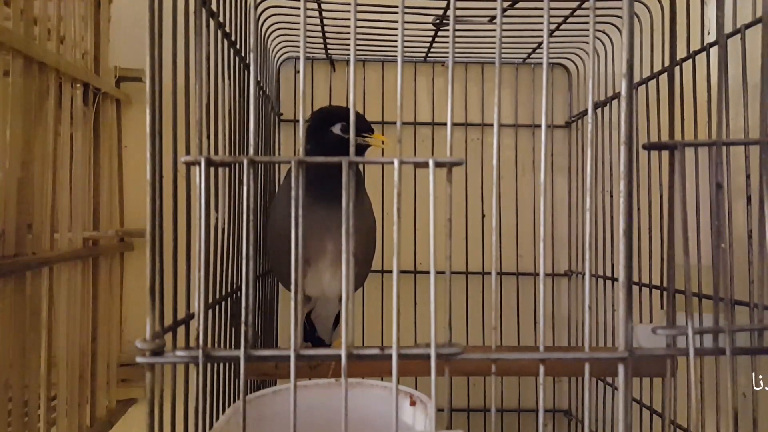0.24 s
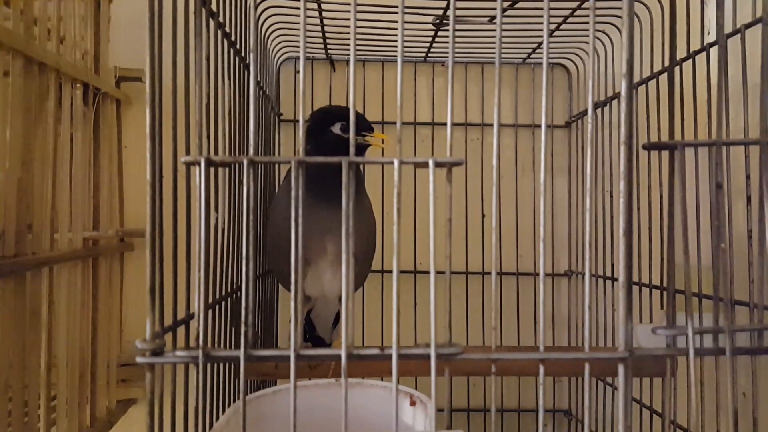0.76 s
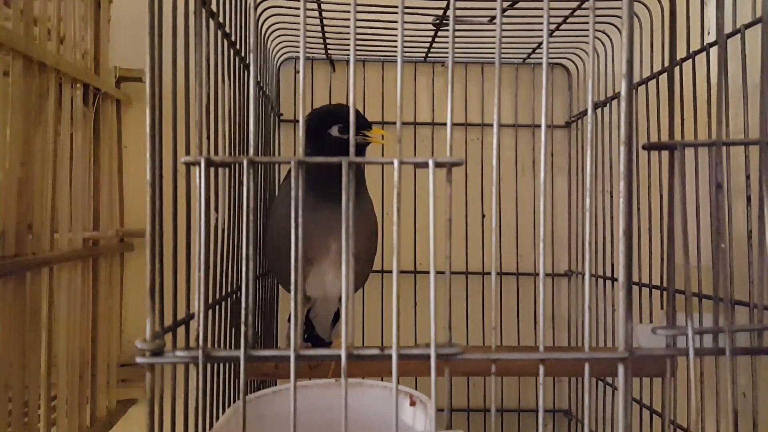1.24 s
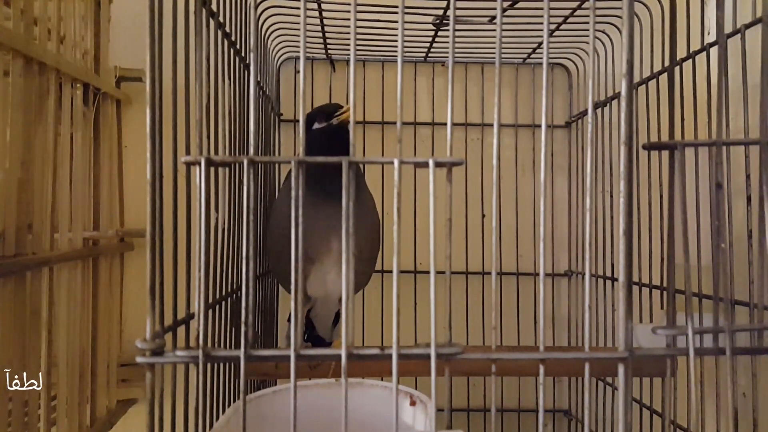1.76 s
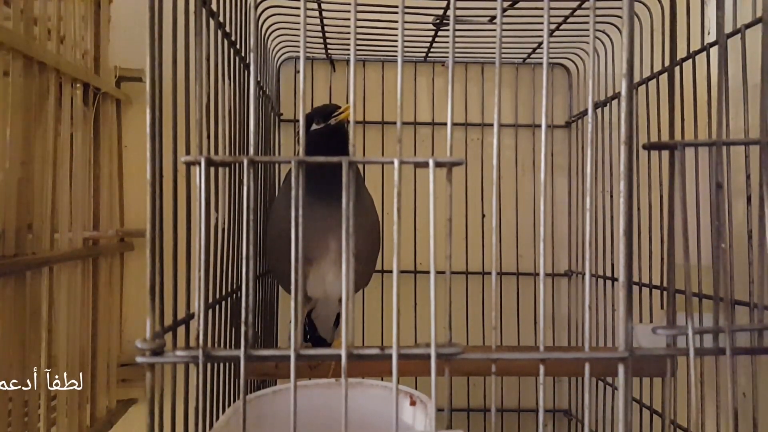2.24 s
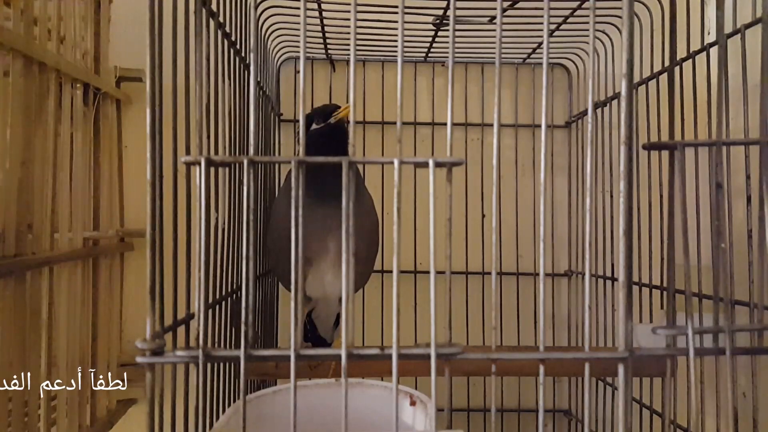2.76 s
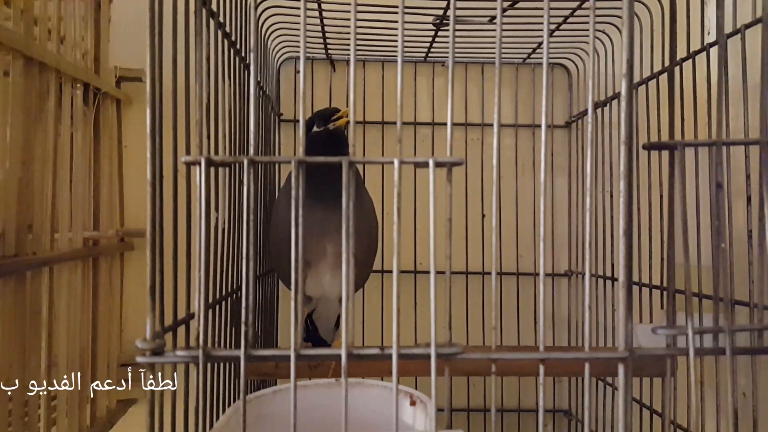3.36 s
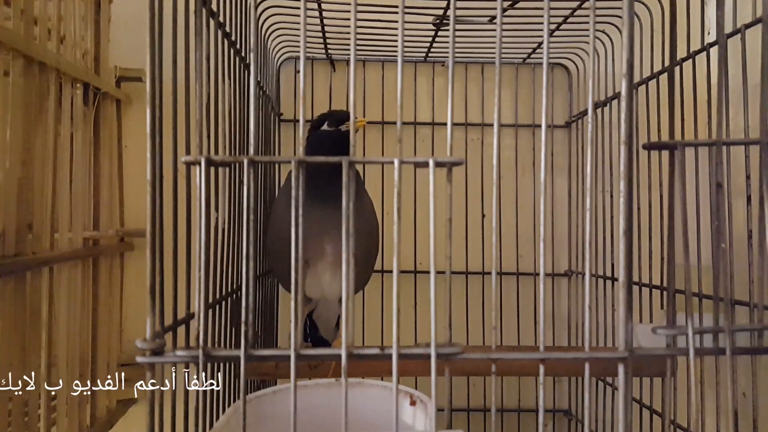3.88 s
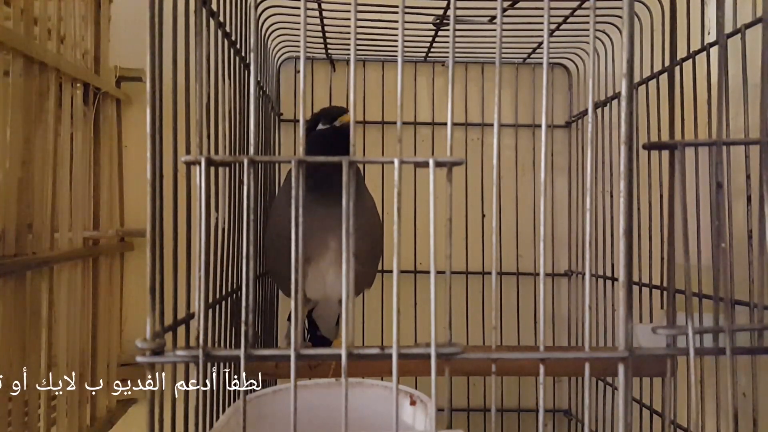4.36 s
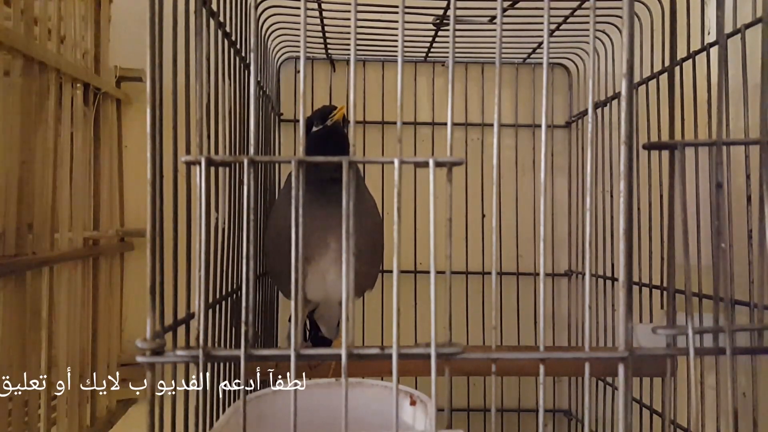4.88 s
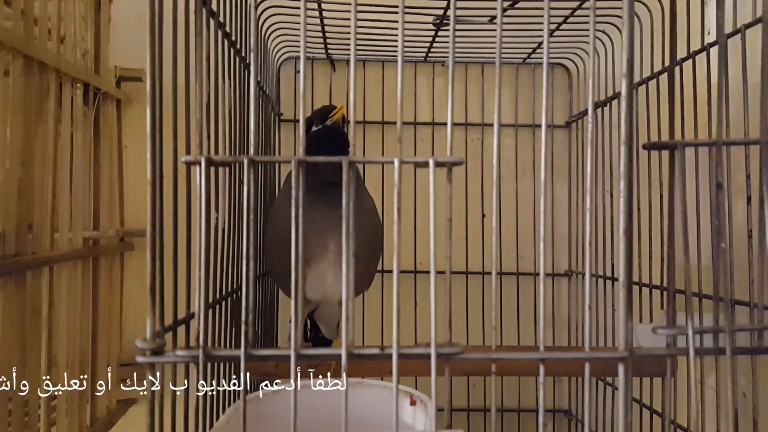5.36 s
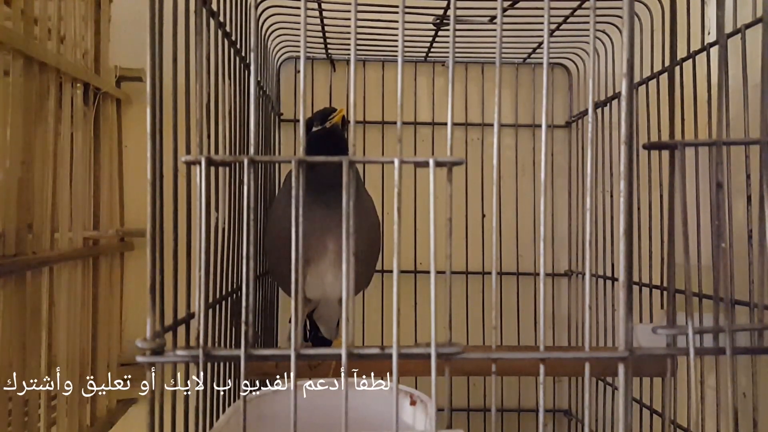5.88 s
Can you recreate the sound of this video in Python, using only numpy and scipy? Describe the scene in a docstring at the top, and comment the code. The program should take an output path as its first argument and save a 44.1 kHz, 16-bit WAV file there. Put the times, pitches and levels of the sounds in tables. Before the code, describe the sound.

Loud, clear bird whistles repeat briskly indoors, breaking into warbles, sharp chirps, six dry clucks and thin sliding squeals, with a quiet fan behind.

```python
"""Caged myna in a bare room

A caged myna sings in a bare, echoing room, close to a phone with two microphone ports. Whistles, flips
and slides are near sines with weak overtones and breath; thin glides have a strong 2nd overtone; a gurgling
warble swings its pitch fast; clucks mix two voices. Noise makes soft shuffles on the perch and a decaying
tail smears every sound of the bird. A fan hums faintly: wavering motor lines over rushing air."""
import sys
import numpy as np
from scipy import signal
from scipy.fft import rfft, irfft, next_fast_len
from scipy.io import wavfile
from scipy.ndimage import uniform_filter1d, minimum_filter1d, map_coordinates

SR = 44100
rng = np.random.default_rng(int(sys.argv[2]) if len(sys.argv) > 2 else 0)


def linear_from_db(decibels):
    """Turn decibels (scalar or array-like) into linear amplitude factors; 0 gives 1."""
    return 10 ** (np.asarray(decibels, float) / 20)


def dump_mix(stems):
    """Bounce the given channels to the path in sys.argv[1] as a 16-bit WAV at rate SR."""
    frames = np.atleast_2d(stems).T  # one column per channel
    limited = np.clip(frames, -1, 1)  # hard clip at full scale
    pcm = np.round(limited * 32767).astype(np.int16)
    wavfile.write(sys.argv[1], SR, pcm)


N = 269892
LEAD = SR // 4  # samples rendered before time zero

# Air past the membranes of the syrinx. Each row: frequency in Hz, relative level in dB.
BREATH = [(2500, -59.5), (3500, -3), (5000, 2), (8000, -7), (10000, -1.5), (15000, -18)]
# Overtones of whistles and flips. Each row: pitch in Hz, 2nd overtone in dB, 3rd overtone in dB.
OVERTONES = [(1770, -32, -35.5), (2220, -36, -52), (2510, -29, -40.5), (2640, -28.5, -23.5),
             (2780, -34.5, -35), (2800, -37, -46.5)]


def along(points, hz):
    """Reads (Hz, value) points on a log frequency axis."""
    point_hz, values = np.transpose(points)
    return np.interp(np.log(hz + 1), np.log(point_hz + 1), values)


def unit(x):
    """Scales to rms 1."""
    return x / np.sqrt(np.mean(x ** 2) + 1e-20)


def filtered(x, response):
    """Multiplies the spectrum of x by a response, a function of frequency."""
    m = next_fast_len(x.shape[-1] + 8192)
    spectrum = rfft(x, m) * response(np.fft.rfftfreq(m, 1 / SR))
    return irfft(spectrum, m)[..., :x.shape[-1]]


def wobble(n, rate):
    """A smooth random curve with rate knots a second."""
    knots = rng.standard_normal(int(n * rate / SR) + 4)
    return map_coordinates(knots, [np.arange(n) * rate / SR])


def hiss(n, spectrum):
    """Coloured noise of rms 1."""
    return unit(filtered(rng.standard_normal(n), lambda hz: linear_from_db(along(spectrum, hz))))


def played(points):
    """Start time, the columns drawn sample by sample, and a soft-edged gate."""
    s, *columns = np.transpose(points)
    t = np.arange(s[0], max(s[-1], s[0] + 0.01), 1 / SR)
    edge = np.clip(np.minimum(t - t[0], t[-1] - t) / 0.0038, 0, 1)
    curves = [uniform_filter1d(np.interp(t, s, column), 130) for column in columns]
    return t[0], curves, np.sin(np.pi / 2 * edge) ** 2


def syrinx(hz, second_db, third_db, fourth_db):
    """A sine that follows the pitch, with three overtones at levels against it."""
    turn = 2 * np.pi * np.cumsum(hz) / SR + rng.uniform(0, 2 * np.pi)
    voice = np.sin(turn)
    for times, db in [(2, second_db), (3, third_db), (4, fourth_db)]:
        voice = voice + linear_from_db(db) * np.sin(times * turn)
    return voice


def sung(second_db, third_db, jitter_hz, points):
    """One note along (s, Hz, dB) points: jitter roughens it, and jitter or a quick pitch move lets breath through."""
    s, (hz, db), gate = played(points)
    n = len(hz)
    flutter_db = 0.6 * wobble(n, 90)
    pitch_speed = np.abs(np.gradient(hz)) * SR  # Hz a second
    leak = linear_from_db(-73) * min(jitter_hz, 70) + linear_from_db(-48.5) * np.clip(pitch_speed / 12000, 0, 1)
    fourth_db = third_db - 8.5 + 0.6 * (db - db.max())  # the tone at four times the pitch sounds only near the loudest part of the note
    voice = syrinx(hz + jitter_hz * wobble(n, 350), second_db, third_db, fourth_db)
    return s, gate * linear_from_db(db + flutter_db) * (voice + leak * hiss(n, BREATH))


def tinted(table, points, jitter_hz):
    """Sings a note with the overtones that belong to its mean pitch."""
    hz = np.mean([point[1] for point in points])
    second_db, third_db = [along([(row[0], row[k]) for row in table], hz) for k in (1, 2)]
    return sung(second_db, third_db, jitter_hz, points)


def slides():
    """Rough slides in pitch that swell towards the middle."""
    # Each row: start in seconds, length in seconds, from Hz, to Hz, peak level in dB, pitch jitter in Hz.
    slide_rows = [(-.2, 0.038, 1273, 1170, -30.5, 70), (-.13, .08, 4100, 3240, -25, 150),
                  (.01, 0.054, 3620, 3250, -21, 30), (2.435, .11, 2772, 2846, -5.5, 27),
                  (2.803, 0.077, 2780, 2799, -3.5, 18), (2.797, 0.11, 4220, 4060, -43, 35),
                  (2.901, 0.22, 2769, 2745, -16, 8), (3.411, 0.14, 1059, 1315, -40, 44),
                  (3.692, 0.11, 1414, 1290, -37.5, 53), (5.436, 0.047, 1978, 2092, -37.5, 18)]
    # Each row: pitch in Hz, 2nd overtone in dB, 3rd overtone in dB.
    slide_overtones = [(1200, -36, -47.5), (2800, -39.5, -47.5), (3600, -38.5, -47), (4100, -64, -63.5)]
    for s, length, start, end, db, jitter_hz in slide_rows:
        yield tinted(slide_overtones, [(s, start, db - 7.5),
                                       (s + 0.4 * length, (start + end) / 2, db),
                                       (s + length, end, db - 3.5)], jitter_hz)


def whistles():
    """Plain whistles scoop up to full level, then drift to the end pitch and fade."""
    # Each row: start in seconds, length in seconds, pitch at full level in Hz, end pitch in Hz, peak level in dB.
    whistle_rows = [(-.15, 0.06, 1916, 1852, -8), (-.07, 0.054, 2882, 2800, -11.5),
                    (0.271, 0.068, 2315, 2183, -2.5), (0.544, 0.07, 2243, 2175, -4.5),
                    (0.822, 0.064, 2259, 2166, -2.5), (1.093, 0.071, 2223, 2141, -4),
                    (1.492, 0.061, 2233, 2160, -1.5), (1.884, 0.074, 2228, 2116, -2),
                    (2.415, 0.07, 2231, 2241, -2.5), (6.079, 0.042, 1943, 1914, -9.5)]
    rise_share, scoop = 0.38, 0.07  # part of the note spent rising, part of the pitch missing at the start
    start_db = -21
    for s, length, full, end, db in whistle_rows:
        rise = rise_share * length
        yield tinted(OVERTONES, [(s, full * (1 - scoop), db + start_db),
                                 (s + rise / 2, 0.99 * full, db + start_db / 2),
                                 (s + rise, full, db),
                                 # halfway through the fade only part of the drift is done
                                 (s + (rise + length) / 2, full + 0.27 * (end - full), db - 5.5),
                                 (s + length, end, db - 6.5)], jitter_hz=6.4)


def rush(spectrum):
    """Stereo noise of rms 1, alike at both ports in the bass."""
    # Each row: frequency in Hz, left-right likeness (1 is identical).
    likeness = [(60, 0.98), (180, 0.81), (350, 0.88), (700, 0.18), (1500, 0.036)]

    def split(hz):
        turn = np.arccos(np.clip(along(likeness, hz), -1, 1)) / 2
        return linear_from_db(along(spectrum, hz)) * np.array([np.cos(turn), np.sin(turn)])

    mid, side = filtered(rng.standard_normal((2, N)), split)
    return unit(np.array([mid + side, mid - side]))


def fan():
    """Wavering motor lines over rushing air swell and sag together; a steady hiss lies on top."""
    # Motor lines. Each row: frequency in Hz, width in Hz, level in dB.
    motor_lines = [(42, 4, -60.5), (75.3, 3, -51), (90, 3.5, -63.5), (107, 3.4, -70), (149, 1, -58),
                   (148.8, 5.7, -59), (216.6, 8.9, -63.5), (321, 0.8, -64.5)]
    # Swelling of lines and air. Each row: time in seconds, level in dB (only the distance from the mean counts).
    swell_points = [(0.0, -49), (0.251, -49), (1.279, -45), (2.929, -46), (3.071, -43), (3.441, -46),
                    (4.379, -42.5), (4.77, -44.5), (4.868, -44), (5.33, -45), (5.47, -44), (5.88, -45.5),
                    (6.12, -43.5)]
    # Rushing air. Each row: frequency in Hz, relative level in dB per Hz.
    air_spectrum = [(15, -40.5), (25, -3.5), (60, -22), (92, -4.5), (150, -7), (177, -11), (305, -9.5),
                    (872, -19.5), (1210, -19), (1900, -21.5), (2470, -72.5), (4180, -120)]
    # Steady hiss. Each row: frequency in Hz, relative level in dB per Hz.
    hiss_spectrum = [(1200, -26.5), (2000, 1), (3300, 1.5), (4600, -11.5), (6500, -11), (8500, -9),
                     (10000, -41)]
    turn = 2 * np.pi * np.arange(N) / SR
    lines = np.zeros(N)
    for hz, width, db in motor_lines:
        level = np.sqrt(2) * linear_from_db(db + 3.2 * wobble(N, 1.6 * width))
        lines += level * np.sin(hz * turn + 1.5 * wobble(N, width))
    s, db = np.transpose(swell_points)
    swell = linear_from_db(np.interp(np.arange(N) / SR, s, db - db.mean()))
    return swell * (lines + linear_from_db(-48.5) * rush(air_spectrum)) + linear_from_db(-56.5) * rush(hiss_spectrum)


def flips():
    """A short upward slur breaks into a high note; the two overlap around the break."""
    # Each row: time of the break in seconds, length in seconds, pitch just after the break in Hz,
    # end pitch in Hz, peak level in dB.
    flip_rows = [(0.047, 0.029, 2831, 2935, -2), (0.446, .04, 2942, 3000, -7.5),
                 (0.72, .038, 2783, 2728, -2), (0.992, 0.033, 2780, 2688, -2.5),
                 (1.27, 0.038, 2780, 2739, -1), (1.389, .046, 2640, 2532, -6),
                 (1.655, 0.038, 2929, 2982, -5.5), (1.778, 0.034, 2653, 2552, -3.5),
                 (2.051, 0.034, 2927, 2977, -2), (2.184, 0.034, 2663, 2540, -3.5),
                 (2.604, 0.049, 2700, 2512, -6.5)]
    slur_s, slur_db = 0.024, -7  # the slur's level is against the high note
    break_s, break_db = 0.0071, -14
    for s, length, high, end, db in flip_rows:
        yield tinted(OVERTONES, [(s - slur_s, 2330, db + slur_db - 6),
                                 (s, 2496, db + slur_db),
                                 (s + break_s, high, db + break_db)], jitter_hz=15.0)
        yield tinted(OVERTONES, [(s - break_s, high, db + break_db),
                                 (s + break_s / 2, high, db - 4.5),
                                 (s + 0.4 * length, 0.62 * high + 0.38 * end, db),
                                 (s + length, end, db - 4.5)], jitter_hz=10.0)


def dips():
    """Dips drop fast and rest on the low pitch."""
    # Each row: start in seconds, length in seconds, high pitch in Hz, low pitch in Hz, level in dB.
    dip_rows = [(0.149, .058, 2159, 1884, -13.5), (2.289, .066, 2120, 1885, -11)]
    for s, length, high, low, db in dip_rows:
        yield sung(-26, -32, 4.5, [(s, high, db - 9.5),
                                   (s + 0.23 * length, 0.7 * high + 0.33 * low, db),
                                   (s + 0.56 * length, low, db - 4.5),
                                   (s + length, low, db - 1.5)])


def shuffles():
    """The bird shifts on its perch: short soft scrapes of coloured noise."""
    # Each row: start in seconds, level in dB, length in seconds.
    shuffle_rows = [(2.365, -41.5, 0.2), (3.666, -36.5, 0.17)]
    # Colour of the scrape. Each row: frequency in Hz, relative level in dB.
    scrape_spectrum = [(150, -48.5), (300, -11), (700, -5), (1500, -4.5), (2500, -5), (8000, -13.5),
                       (10000, -77)]
    for s, db, length in shuffle_rows:
        t = np.arange(0, length, 1 / SR)
        level = linear_from_db(db + 4.7 * wobble(len(t), 47))
        shape = np.clip(t / 0.03, 0, 1) * (1 - t / length)
        yield s, level * shape * hiss(len(t), scrape_spectrum)


def warbles():
    """Gurgles: the pitch swings fast and unevenly about a centre, and the top of each swing is louder."""
    # Each row: start in seconds, length in seconds, centre pitch in Hz, swing in Hz, level at the middle in dB.
    warble_rows = [(2.482, 0.095, 2380, 90, -20), (2.635, .068, 2160, 201, -13.5),
                   (2.706, .08, 1880, 203, -17.5), (2.843, .1, 1532, 205, -25),
                   (2.972, 0.07, 1984, 167, -14.5), (3.049, 0.15, 1746, 300, -16.5)]
    for s, length, centre, full, db in warble_rows:
        s, (hz, swing, db), gate = played([(s, centre, 0.77 * full, db - 2.5),
                                           (s + length / 2, centre, full, db),
                                           (s + length, centre, full, db)])
        n = len(hz)
        rate = 83 * (1 + 0.19 * wobble(n, 17.0))  # swings a second
        beat = np.sin(2 * np.pi * np.cumsum(rate) / SR + rng.uniform(0, 2 * np.pi))
        voice = syrinx(hz + swing * beat + 45 * wobble(n, 300), -39, -45.5, -46)
        yield s, gate * linear_from_db(db + 5.2 * beat) * (linear_from_db(-37) * hiss(n, BREATH) + voice)


def chirps():
    """Chirps leap up and slide down to a loud landing note."""
    # Each row: start in seconds, start pitch in Hz, top pitch in Hz, rise in seconds, fall in seconds, level in dB.
    chirp_rows = [(3.37, 2480, 4250, .034, 0.027, -14), (3.565, 2720, 5050, .016, .04, -12),
                  (3.755, 2750, 5200, 0.015, .048, -11.5)]
    ready_s, top_s, land_s, land_hz = 0.018, 0.0083, 0.026, 2887
    for s, start, top, rise, fall, db in chirp_rows:
        times = s + np.cumsum([0, ready_s, rise / 2, rise / 2, top_s, fall / 2, fall / 2, land_s])
        pitch = [start, 1.04 * start, 0.35 * start + 0.59 * top, top, top,
                 0.48 * top + 0.52 * land_hz, 1.03 * land_hz, land_hz]
        level = db + np.array([0, -4, 5.5, 1.5, 1.5, -2.5, 10, 1.5])
        yield sung(-15, -26, 45, np.transpose([times, pitch, level]))


def clucks():
    """Both sides of the syrinx and their mixing tones start on an abrupt rasp of breath and rattle as they fade."""
    # Each row: start in seconds, length in seconds, low voice in Hz, high voice in Hz, level in dB, mixing in dB.
    cluck_rows = [(3.954, 0.032, 998.4, 1401, -19.5, 5.5), (4.065, 0.034, 985, 1362, -19.5, 5),
                  (4.177, .028, 987, 1399, -17.5, -9), (4.29, 0.025, 996, 1389, -18, -2),
                  (4.401, 0.027, 990, 1401, -18.5, 2), (4.52, 0.049, 1007, 1416, -18, -4)]
    # The two voices, their sum and difference tones. Each row: times the low voice, times the high voice.
    mixing_tones = [(1, 0), (0, 1), (1, 1), (2, 0), (-1, 2), (0, 2), (3, 0), (2, 1), (1, 2), (2, 2),
                    (-2, 2)]
    # Level of each of these tones in dB.
    mixing_levels = [-8, 0, -2, -12.5, -14.5, -25, -28, -23, -31, -39, -34.5]
    # Breath in a cluck. Each row: frequency in Hz, relative level in dB.
    rasp_spectrum = [(400, -41), (800, -21), (1500, 1), (3000, -2.5), (5000, -14.5), (8000, -12.5),
                     (10000, -50)]
    for s, length, low, high, db, mixing_db in cluck_rows:
        t = np.arange(0, length, 1 / SR)
        n = len(t)
        # the pitch starts low and settles within milliseconds
        bend = np.cumsum(1 - 0.085 * np.exp(-t / 0.003) + 0.006 * wobble(n, 230)) / SR
        tones = np.zeros(n)
        for (a, b), tone_db in zip(mixing_tones, mixing_levels):
            # each voice is heard alone; all other tones grow with the strength of the mixing
            mixed = abs(a) + b > 1
            level = linear_from_db(tone_db + mixed * mixing_db + 4.9 * wobble(n, 143))
            tones += level * np.sin(2 * np.pi * (a * low + b * high) * bend + rng.uniform(0, 2 * np.pi))
        onset, fade = np.clip(t / 0.002, 0, 1), 1 - t / length
        rasp = onset * linear_from_db(-3.5 - 60 * t / 0.39) * hiss(n, rasp_spectrum)
        yield s, linear_from_db(db) * (onset * fade ** 0.6 * tones + rasp * fade)


def shrieks():
    """Shrieks start loud and sink away in pitch and level."""
    # Each row: start in seconds, length in seconds, from Hz, to Hz, peak level in dB, pitch jitter in Hz.
    shriek_rows = [(4.644, 0.11, 5200, 4123, -16.5, 130), (4.666, 0.072, 4084, 3840, -19, 5.2),
                   (5.868, 0.026, 3680, 3600, -23, 8), (5.874, 0.062, 5730, 4700, -15, 64),
                   (5.88, 0.079, 4235, 3710, -19.5, 5.6)]
    # Each row: pitch in Hz, 2nd overtone in dB, 3rd overtone in dB.
    shriek_overtones = [(3900, -16, -49), (4700, -10.5, -45.5), (5200, -54, -57.5)]
    for s, length, start, end, db, jitter_hz in shriek_rows:
        yield tinted(shriek_overtones, [(s, start, db - 1),
                                        (s + 0.2 * length, 0.7 * start + 0.3 * end, db),
                                        (s + length, end, db - 17)], jitter_hz)


def drops():
    """A thin squeak hooks down and lands loud."""
    # Each row: start in seconds, length in seconds, from Hz, to Hz, level in dB.
    drop_rows = [(4.744, .046, 3900, 3057, -13.5), (5.983, .033, 4054, 2800, -16)]
    for s, length, start, end, db in drop_rows:
        yield sung(-4, -26, 6, [(s, start, db - 12.5),
                                (s + 0.55 * length, 1.03 * end, db),
                                (s + length, end, db - 9.5)])


def glides():
    """Thin glides wander along drawn curves with a strong 2nd overtone."""
    # Each row: 2nd overtone in dB, 3rd overtone in dB, pitch jitter in Hz,
    # then a list of points: time in seconds, pitch in Hz, level in dB.
    glide_rows = [(-0.64, -19, 18, [(4.886, 3560, -21), (4.902, 3446, -19), (4.94, 3040, -32),
                  (5.0, 2925, -35), (5.12, 2737, -37), (5.2, 2758, -35.5), (5.29, 2888, -34),
                  (5.37, 3415, -31.5), (5.44, 3638, -32.5), (5.54, 3430, -28.5)]),
                  (-0.89, -22.5, 15, [(5.548, 3460, -44), (5.56, 3397, -29.5), (5.6, 3090, -31.5),
                  (5.66, 2793, -38), (5.8, 2542, -45.5)])]
    for second_db, third_db, jitter_hz, points in glide_rows:
        yield sung(second_db, third_db, jitter_hz, points)


def pips():
    """Pips scoop up from far below."""
    # Each row: start in seconds, length in seconds, top pitch in Hz, level in dB.
    pip_rows = [(4.979, 0.0257, 1980, -29.5), (5.09, 0.0355, 2066, -24.5)]
    for s, length, top, db in pip_rows:
        yield sung(-40, -45, 4, [(s, 0.73 * top, db - 14.5),
                                 (s + 0.523 * length, top, db),
                                 (s + length, top, db - 7.5)])


def room(sound, early_db, shared):
    """The sound itself, near walls, then a tail in which each frequency dies at its own speed."""
    # Each row: frequency in Hz, time to fall by 60 dB in seconds, tail level in dB.
    tail_rows = [(300, 1.1, 7), (990, 1.49, 2.5), (2000, 1.32, 0), (3000, 1.005, 0), (4030, 0.93, -1),
                 (5500, 0.84, -4), (9000, 0.64, -5), (14000, 0.33, -12.5)]
    hz, t, noise = signal.stft(rng.standard_normal((2, SR)), SR, nperseg=256)
    t60, wet_db = [along([(row[0], row[k]) for row in tail_rows], hz)[:, None] for k in (1, 2)]
    # each band's tail carries the energy the table gives it, however long it lasts
    fade = linear_from_db(wet_db - 60 * t / t60) * np.sqrt(6 * np.log(10) / (t60 * SR))
    tail = signal.istft(noise * fade, SR, nperseg=256)[1][:, :SR]
    tail *= np.clip(np.arange(SR) / SR / 0.01, 0, 1)
    # part of the echo comes from the bird's side
    tail[1] = np.sin(shared) * np.roll(tail[0], shift=5) + np.cos(shared) * tail[1]
    walls = rng.integers(40, 700, size=8)  # delays in samples
    strength = linear_from_db(early_db) * rng.standard_normal(8)
    tail[0, walls] += strength
    tail[1, walls + rng.integers(-5, 6, size=8)] += strength
    tail[0, 0] = tail[1, 5] = 1  # the left port is reached first
    return signal.fftconvolve(sound[None], tail, axes=1)


def scene():
    """Every sound of the bird gets its own answer from the room; the fan is added as it is."""
    air = np.zeros((2, LEAD + N + 3 * SR))
    song = [*slides(), *whistles(), *flips(), *dips(), *shuffles(), *warbles(), *chirps(),
            *clucks(), *shrieks(), *drops(), *glides(), *pips()]
    for s, sound in song:
        heard = room(sound, early_db=-13.5, shared=0.14)
        start = LEAD + round(s * SR)
        air[:, start:start + heard.shape[1]] += heard
    return air[:, LEAD:LEAD + N] + fan()


def low_pass(x):
    """Removes everything above the highest recorded frequency."""
    return signal.sosfilt(signal.butter(12, 15720, fs=SR, output="sos"), x)


def record(dry):
    """The phone's body shades the right port from the treble; a limiter holds the peaks."""
    # Overall treble colour: the level falls away around 10 to 11 kHz. Each row: frequency in Hz, gain in dB.
    treble_colour = [(3000, 0.5), (4500, -2), (6000, 0), (7700, 0), (8800, -3.5), (9800, -11.5),
                     (10800, -24.5), (11800, -8.5), (13000, 2.5), (15500, -5.5)]
    # Right port, turned away. Each row: frequency in Hz, gain in dB.
    shade = [(700, 0.5), (1300, -1), (2400, -3), (4400, -8), (6000, -14), (8100, -40), (11000, -19)]
    left, right = filtered(dry, lambda hz: linear_from_db(along(treble_colour, hz)))
    ports = np.array([left, filtered(right, lambda hz: linear_from_db(along(shade, hz)))])
    allowed = np.minimum(1, 0.92 / (np.abs(ports).max(axis=0) + 1e-9))
    # the gain ducks ahead of each peak and recovers after it
    gain = uniform_filter1d(minimum_filter1d(allowed, size=881), size=441)
    return low_pass(ports * gain)


dry = scene()
out = record(dry)
dump_mix(out)
```